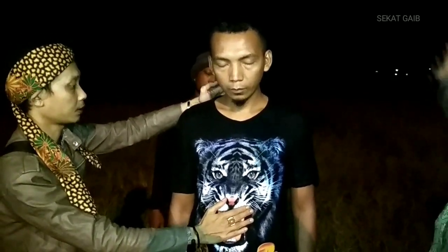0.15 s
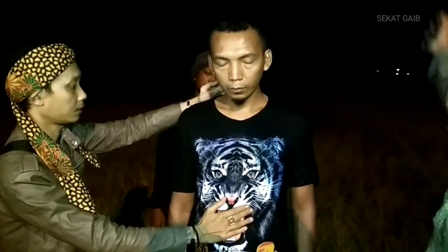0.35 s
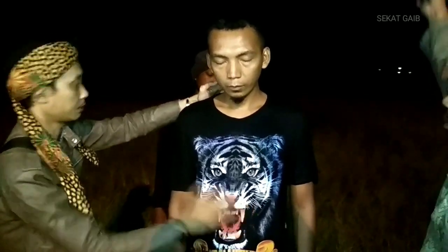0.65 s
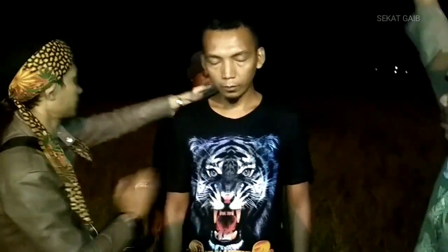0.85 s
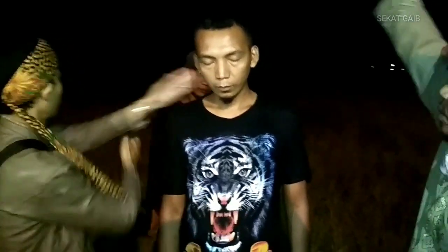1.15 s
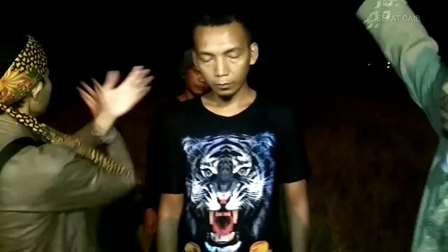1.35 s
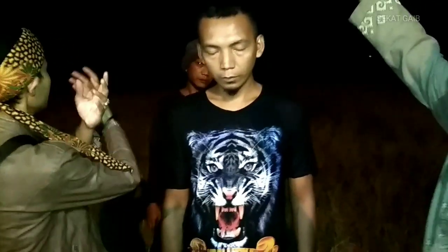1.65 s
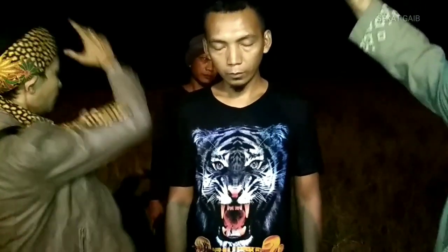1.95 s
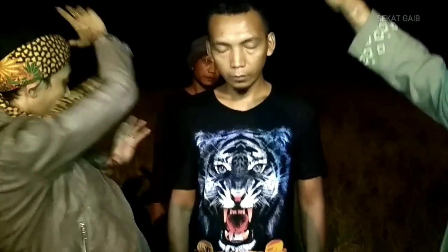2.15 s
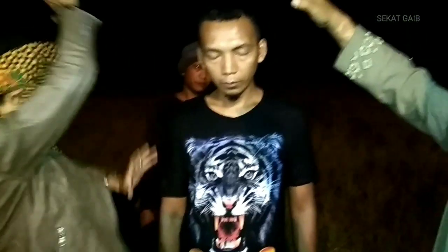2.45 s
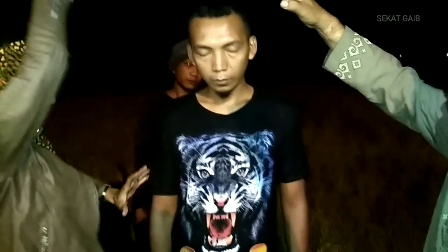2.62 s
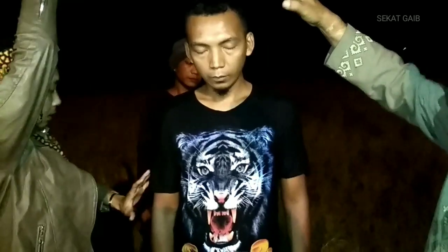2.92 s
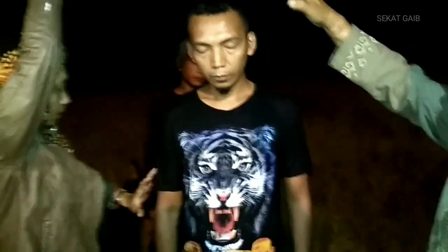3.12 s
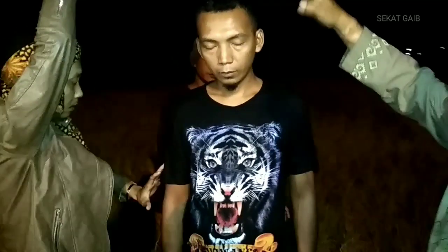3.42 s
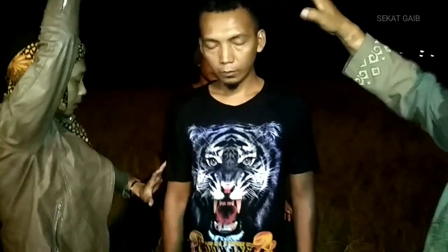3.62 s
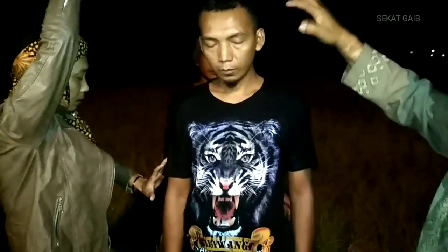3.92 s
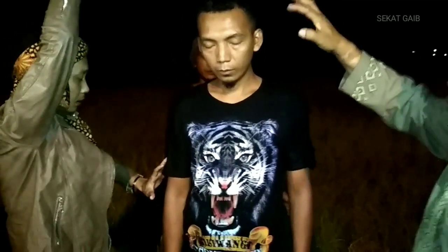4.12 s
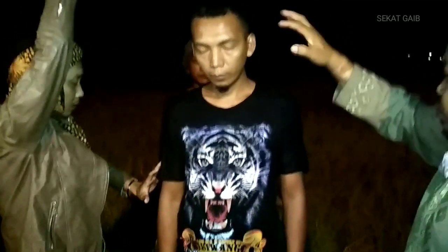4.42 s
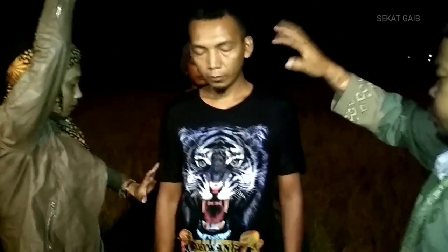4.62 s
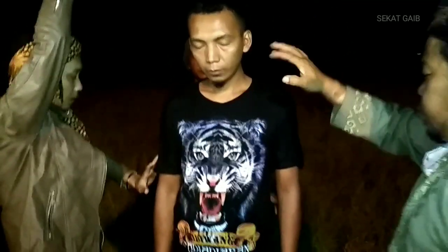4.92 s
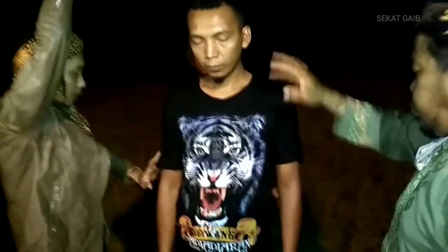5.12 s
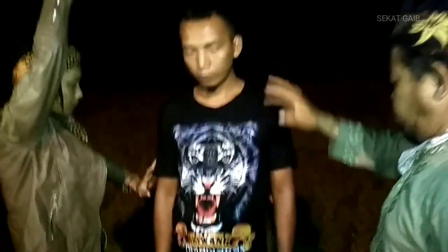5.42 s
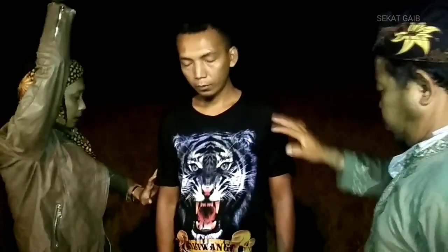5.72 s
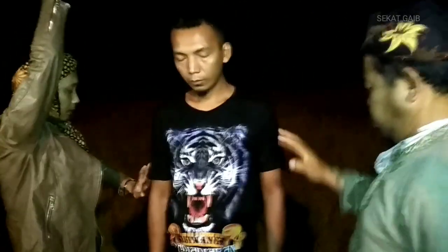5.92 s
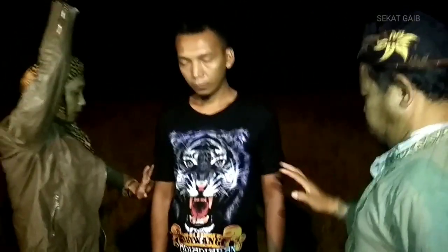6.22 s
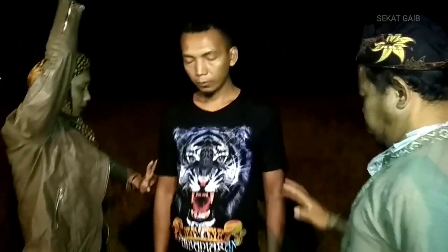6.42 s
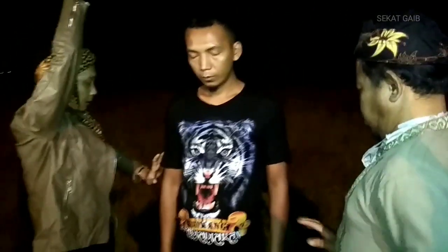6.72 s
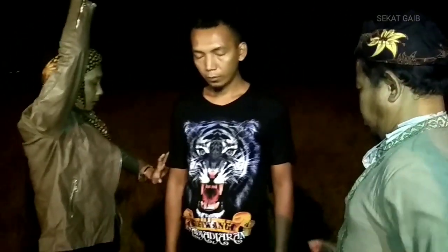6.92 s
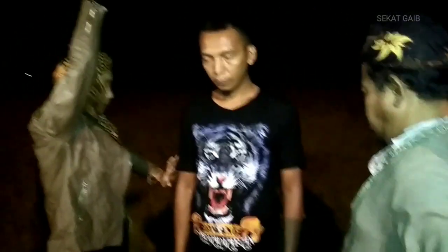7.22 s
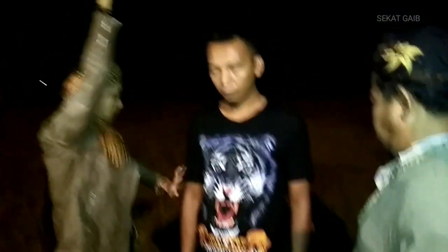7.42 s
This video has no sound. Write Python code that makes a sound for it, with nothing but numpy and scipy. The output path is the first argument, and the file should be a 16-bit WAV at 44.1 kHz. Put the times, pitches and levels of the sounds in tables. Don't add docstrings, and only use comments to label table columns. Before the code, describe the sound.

A near katydid on the left scrapes about four bright chirps a second above shrill insect buzzing, joined by a far cricket, over faint low haze.

```python
import sys
import numpy as np
from scipy import signal
from scipy.fft import rfft, irfft
from scipy.io import wavfile
from scipy.ndimage import uniform_filter1d

SR = 44100
rng = np.random.default_rng(int(sys.argv[2]) if len(sys.argv) > 2 else 0)


def unload_audio(sound):
    columns = np.transpose(np.atleast_2d(sound))
    steps = np.round(np.clip(columns, -1, 1) * 32767)
    wavfile.write(sys.argv[1], SR, steps.astype(np.int16))


def gain_from_decibels(decibels):
    exponent = np.asarray(decibels, float) / 20
    return 10 ** exponent


N = 332955

# pitch_hz, level_db (per Hz)
HAZE_SPECTRUM = [(13, -58), (22, -49), (48, -8), (171, -1), (235, -10), (278, -12), (311, -15), (348, -18),
                 (524, -26), (884, -29.5), (971, -38.5), (1520, -55.5), (1900, -66), (2470, -80),
                 (4180, -120)]
# low_hz, high_hz, level_db, throb_hz
CHORUS_BANDS = [
    (2162, 2642, -53.5, 30),
    (4307, 5170, -47.5, 56),
    (2780, 3850, -60.5, 9),
]
# time_s, rest_db (between pulses), pulse_db (rise on a pulse)
FROG_PULSING = [
    (0, -60.5, 7),
    (1, -56.5, -1.5),
    (2, -57, 5.5),
    (3.1, -58, 6),
    (3.8, -58.5, 5),
    (5.4, -59, 3),
    (6.2, -59.5, 6),
    (6.8, -63.5, 14.5),
    (7.55, -54.5, 3.5),
]
# peak_s, level_db, rise_s, fall_s, treble_db
BRUSHES = [(.8, -58, 0.2, 0.31, -19), (1.19, -56.5, 0.055, 0.83, -20), (1.6, -47.5, 0.084, 0.096, 6.5),
           (1.91, -50, 0.21, 0.45, 0.5), (2.5, -54.5, 0.22, 0.22, -24), (2.9, -55, 0.22, 0.59, -24),
           (3.45, -55.5, 0.6, 0.32, -22), (3.8, -58, 0.16, 0.56, -13), (4.25, -62, 0.36, 0.3, -20),
           (4.68, -64.5, 0.042, 0.29, -21), (5.22, -54.5, 0.11, 0.082, -11), (5.76, -54, 0.19, 0.23, -20),
           (5.96, -53.5, 0.085, 0.22, -26), (6.6, -61.5, .3, 0.29, -19), (7.46, -65, 0.29, 0.28, -21)]
# pitch_hz, level_db (per Hz)
RUSTLE_SPECTRUM = [(240, -37), (400, -6.5), (681, -3), (874, -8), (973, -0.5), (1210, -8), (1440, -5.5),
                   (2000, -13.5), (2600, -73), (4400, -120)]
# start_s, level_db, pitch_hz, t60_s, pan_db (left minus right)
FOOTFALLS = [(.648, -42, 300, 0.076, 8), (.976, -38, 358, 0.038, .5), (1.505, -34.5, 650, 0.12, 0),
             (1.62, -44, 820, .09, 0), (1.886, -30.5, 320, 0.32, 2), (1.915, -31, 317, .16, -3),
             (1.94, -39, 334, 0.09, 0), (2.488, -28, 510, 0.04, 1), (5.035, -43, 330, .06, .5),
             (5.759, -40, 600, 0.089, -3), (7.461, -44, 684, 0.091, 0)]
# pitch_hz, width_hz, left_db, right_db
BUZZER_BODY = [(10830, 2700, -29, -8), (12530, 2800, 0, 1.5), (14400, 1500, -14.5, -6)]
# time_s, level_db
BUZZER_LEVEL = [
    (0.0, -41),
    (1.53, -36),
    (1.58, -32),
    (1.91, -42.5),
    (2.96, -36),
    (3.89, -42),
    (5.72, -37),
    (6.27, -41),
    (7.06, -36.5),
    (7.55, -36.5),
]
# pitch_hz, width_hz, left_db, right_db
FAR_WINGS = [(6100, 700, 0, 0), (7100, 900, 1, 1), (8100, 900, 1, 4), (9000, 900, -.5, 1.5),
             (9900, 1100, .5, 2.5), (11100, 1300, -1, 4), (12300, 1100, -3, 2), (13300, 1000, 0, 2.5),
             (14700, 1400, -6, -6)]
# last_stroke_s, peak_db
CRICKET_CHIRPS = [(3.4087, -34.5), (3.639, -34.5), (3.8755, -33.5), (4.1094, -34), (4.3588, -32),
                  (4.58, -31), (4.7976, -31), (5.0306, -31.5), (5.2584, -30.5), (5.483, -29.5),
                  (5.7109, -30.5), (5.9415, -29), (6.1874, -29), (6.4128, -29.5), (6.633, -30.5),
                  (6.856, -30), (7.0835, -29.5), (7.3194, -32.5)]
# multiple (of the pitch), left_db, right_db
CRICKET_OVERTONES = [(1, -24, -19.5), (2, -31, -28), (3, -3, -5), (4, -6.5, -17), (5, -9, -26),
                     (6, -5.5, -27)]
# click_s, click_db
FULL_CHIRPS = [(0.0285, -14), (0.272, -17.5), (0.4993, -15), (0.7356, -17), (0.9665, -13.5), (1.201, -16),
               (1.4298, -15.5), (1.6573, -14), (1.888, -14.5), (2.125, -13), (2.3585, -18), (2.591, -14),
               (2.821, -14.5), (3.055, -12.5), (3.286, -14.5), (3.506, -16), (3.7375, -15), (3.9672, -12.5),
               (4.1918, -17), (4.4197, -12.5), (4.6486, -15), (5.283, -13.5), (5.516, -13), (5.7526, -13.5),
               (5.9785, -13), (6.2063, -14), (6.438, -12), (6.8798, -12.5), (7.1114, -16), (7.341, -12.5)]
# click_s, click_db
CUT_CHIRPS = [
    (4.8848, -16.5),
    (5.0835, -14),
    (6.673, -13),
]
# start_s, length_s, level_db
CHIRP_STROKES = [
    (-.021, .014, -16),
    (.0075, .003, -12),
    (.0155, .021, 0),
    (.0395, .021, 0),
    (.0635, .021, -1),
]
# time_s, level_db, upper_db (extra upper wing ring as it turns)
KATYDID_EFFORT = [
    (0, -26, -3),
    (1.5, -26, -0.5),
    (3, -25, -1.5),
    (4, -25, -2.5),
    (4.7, -26.5, 6),
    (5.2, -26.5, 4),
    (6, -24.5, 2.5),
    (7, -25, 5),
    (7.55, -25.5, 4.5),
]
# pitch_hz, width_hz, left_db, right_db
KATYDID_WING = [(6200, 1250, -18.5, -22), (7290, 1300, -11, -13), (7900, 950, -4, -9),
                (8500, 940, -11.5, -11.5), (9660, 640, -10.5, -12), (10560, 380, -14.5, -13),
                (11500, 1000, -16, -16.5), (12850, 830, -17.5, -31), (13870, 1200, -12, -22),
                (15300, 830, -16.5, -24), (3270, 1220, -30, -34.5), (2522, 220, -32, -37.5)]
# pitch_hz, level_db (per bin)
SILENCE_LIMIT = [(800, -39), (1300, -29.5), (1900, -33), (2400, -23), (3000, -19.5), (4000, -19.5),
                 (4700, -14.5), (5350, -10), (6500, -88), (10000, -37), (13500, -9), (14500, -11),
                 (16000, -6)]


def curve(table):
    time_s, *columns = np.transpose(table)
    return [np.interp(np.arange(N) / SR, time_s, column) for column in columns]


def level(x, db):
    return x * gain_from_decibels(db) / np.sqrt(np.mean(x ** 2))


def band(x, low_hz, high_hz, order=2):
    sos = signal.butter(order, [low_hz, min(high_hz, .45 * SR)], "band", fs=SR, output="sos")
    return signal.sosfilt(sos, x)


def stereo_gain(left_db, right_db):
    return gain_from_decibels(np.array([[left_db], [right_db]]))


def walk(rate_hz):
    hold = int(SR / rate_hz)
    held = np.repeat(rng.standard_normal(N // hold + 1), hold)
    return 1.3 * uniform_filter1d(uniform_filter1d(held, hold), hold)[:N]


def swell(peak_s, rise_s, fall_s):
    late = np.arange(N) / SR - peak_s
    return np.exp(np.where(late < 0, late / rise_s, -late / fall_s))


def coloured(spectrum, alike_hz):
    hz = np.maximum(np.fft.rfftfreq(N, 1 / SR), 1)
    pitch_hz, level_db = np.transpose(spectrum)
    colour = gain_from_decibels(np.interp(np.log(hz), np.log(pitch_hz), level_db))
    mid, side = rfft(rng.standard_normal((2, N)))
    alike = 1 / (1 + (hz / alike_hz) ** 2)
    pair = [np.sqrt(1 + alike) * mid + sign * np.sqrt(1 - alike) * side for sign in (1, -1)]
    return level(irfft(colour * np.array(pair), N), 0)


def body(drive, modes):
    out = 0
    for pitch_hz, width_hz, left_db, right_db in modes:
        ring = band(drive(), pitch_hz - width_hz / 2, pitch_hz + width_hz / 2)
        out = out + stereo_gain(left_db, right_db) * ring / np.sqrt(width_hz / 1000)
    return out


def grass(x, lag_s, wet_db, t60_s):
    t = np.arange(int(.15 * SR)) / SR
    tails = rng.standard_normal((2, len(t))) * np.exp(-np.log(1000) * t / t60_s) * (t > .0004)
    tails = tails / np.sqrt(np.sum(tails ** 2, axis=1, keepdims=True))
    delay = np.exp(-2j * np.pi * np.fft.rfftfreq(N, 1 / SR) * lag_s)
    late = irfft(rfft(x[1]) * delay, N)
    return np.array([x[0], late]) + gain_from_decibels(wet_db) * signal.fftconvolve(x, tails, axes=1)[:, :N]


def teeth(rate_hz, jitter):
    gaps = SR / rate_hz * np.exp(jitter * rng.standard_normal(int(2 * rate_hz * N / SR)))
    at = np.cumsum(gaps).astype(int)
    return at[at < N]


def rasp(force, modes, rate_hz, scatter_db, hiss_db):
    at = teeth(rate_hz, jitter=.25)
    size = gain_from_decibels(scatter_db * rng.standard_normal(len(at)))

    def drive():
        x = gain_from_decibels(hiss_db) * rng.standard_normal(N)
        x[at] += size * rng.uniform(-1.0, 1, len(at))
        return x * force
    return body(drive, modes)


def add_stroke(force, start_s, length_s, level_db):
    u = np.arange(int(length_s * SR)) / (length_s * SR)
    stroke = gain_from_decibels(level_db) * np.minimum(u / 0.037, 1) * np.minimum((1 - u) / 0.2, 1)
    i = int(start_s * SR)
    force[i:i + len(u)] += stroke[:N - i]


def haze():
    return coloured(HAZE_SPECTRUM, alike_hz=483) * gain_from_decibels(-36.5 + 0.63 * walk(4.83))


def chorus():
    layers = []
    for low_hz, high_hz, level_db, throb_hz in CHORUS_BANDS:
        throb = gain_from_decibels([2.54 * walk(throb_hz) + 1.57 * walk(3.16) for _ in range(2)])
        noise = band(rng.standard_normal((2, N)), low_hz, high_hz, order=4)
        layers.append(level(throb * noise, level_db))
    frogs, crickets, filler = layers
    rest_db, pulse_db = curve(FROG_PULSING)
    t = np.arange(N) / SR
    lag_s, half_length_s = 0.066, 0.055
    pulse = sum(np.exp(-((t - click_s - lag_s) / half_length_s) ** 2 / 2)
                for click_s, _ in FULL_CHIRPS + CUT_CHIRPS)
    return frogs * gain_from_decibels(rest_db + pulse_db * pulse + 56.0) + crickets + filler


def rustle():
    brush_power, edge_power = 0, 0
    for peak_s, level_db, rise_s, fall_s, treble_db in BRUSHES:
        shape = swell(peak_s, rise_s, fall_s) * gain_from_decibels(level_db)
        brush_power = brush_power + shape ** 2
        edge_power = edge_power + (shape * gain_from_decibels(treble_db)) ** 2
    brush = np.sqrt(brush_power) + gain_from_decibels(-75)
    grain = coloured(RUSTLE_SPECTRUM, alike_hz=300) * gain_from_decibels(1.8 * walk(40))
    hiss = level(band(rng.standard_normal((2, N)), 3700, 11000), 0)
    return (grain * brush + hiss * np.sqrt(edge_power)) * gain_from_decibels(5.0)


def steps():
    out = np.zeros((2, N))
    t = np.arange(int(.2 * SR)) / SR
    for start_s, level_db, pitch_hz, t60_s, pan_db in FOOTFALLS:
        decay = np.exp(-np.log(1000) * t / t60_s)
        burst = rng.standard_normal(len(t)) * np.minimum(t / 0.0064, 1) * decay
        burst = band(burst, 0.76 * pitch_hz, 1.6 * pitch_hz)
        burst = burst / np.max(np.abs(burst)) * stereo_gain(level_db + pan_db / 2, level_db - pan_db / 2)
        i = int(start_s * SR)
        out[:, i:i + len(t)] += burst[:, :N - i]
    return out


def buzzer():
    pulse_hz = 440.4
    phase = np.cumsum(pulse_hz * (1 + .0025 * walk(12))) / SR
    at = np.flatnonzero(np.diff(np.floor(phase)))
    after = phase[at + 1] % 1 * SR / pulse_hz
    strong_weak = 1 - .45 * (np.arange(len(at)) % 2)
    size = strong_weak * gain_from_decibels(3.8 * rng.standard_normal(len(at)))
    pulses = np.zeros(N + 8)
    for tap in range(-7, 8):
        pulses[np.abs(at + tap)] += size * np.sinc(tap - 1 + after) * np.cos(np.pi * tap / 16) ** 2
    near = level(body(lambda: pulses[:N], BUZZER_BODY), 0)
    near = near * gain_from_decibels(curve(BUZZER_LEVEL)[0] - 4.5 + 1.0 * walk(6.3))
    crowd = []
    for side in range(2):
        singers = rasp(gain_from_decibels(1.06 * walk(25)), FAR_WINGS, rate_hz=1100, scatter_db=5.0, hiss_db=-7.0)
        crowd.append(singers[side])
    return level(np.array(crowd), -38.5) + grass(near, -.0002, wet_db=-3.0, t60_s=.06)


def far_cricket():
    force = np.zeros(N)
    for last_stroke_s, peak_db in CRICKET_CHIRPS:
        for back in range(3):
            weaker_db = 7 * (back == 2)
            add_stroke(force, last_stroke_s - .003 - .0248 * back, .017, peak_db - weaker_db)
    force = uniform_filter1d(force, size=130)
    slide = 0.073 * np.gradient(np.log(uniform_filter1d(force, size=400) + 1e-3)) + 0.0068 * walk(500)
    pitch_hz = 2402
    phase = 2 * np.pi * np.cumsum(pitch_hz * (1 + slide)) / SR
    song = 0
    for multiple, left_db, right_db in CRICKET_OVERTONES:
        flutter = gain_from_decibels(4 * walk(300))
        song = song + stereo_gain(left_db, right_db) * flutter * np.sin(multiple * phase)
    scrape = rasp(force, FAR_WINGS, rate_hz=210, scatter_db=2.5, hiss_db=-14.5) * gain_from_decibels(10.5)
    return grass(song * force * gain_from_decibels(-2.5) + scrape, .0001, wet_db=-3.0, t60_s=.05)


def near_katydid():
    force, click = np.zeros(N), np.zeros(N)
    for chirps, strokes in ((FULL_CHIRPS, CHIRP_STROKES), (CUT_CHIRPS, CHIRP_STROKES[:-1])):
        for click_s, click_db in chirps:
            click[int(click_s * SR) + np.array([0, 30])] = gain_from_decibels(click_db) * np.array([1, .6])
            for start_s, length_s, stroke_db in strokes:
                add_stroke(force, click_s + start_s, length_s, stroke_db + 1.04 * rng.standard_normal())
    level_db, upper_db = curve(KATYDID_EFFORT)
    song = rasp(force, KATYDID_WING, rate_hz=330, scatter_db=0.2, hiss_db=-22.0) * gain_from_decibels(level_db + 34.5)
    song = song + (gain_from_decibels(upper_db) - 1) * band(song, 7650, 8400)
    song = song + body(lambda: click, KATYDID_WING) * gain_from_decibels(23.5)
    return grass(song, lag_s=.00041, wet_db=-2.0, t60_s=.055)


def scene():
    return haze() + chorus() + rustle() + steps() + buzzer() + far_cricket() + near_katydid()


def empty_bands(x, masking_db, load_db, luck_db):
    shape = dict(window="cosine", nperseg=2048, noverlap=1024)
    shift = 88
    hz, _, z = signal.stft(np.roll(x, -shift, axis=1), SR, **shape)
    bins = len(hz)
    power = np.mean(np.abs(z) ** 2, axis=0, keepdims=True)
    narrow = np.repeat(uniform_filter1d(power, size=9, axis=1)[:, 4::9], 9, axis=1)[:, :bins]
    pitch_hz, limit_db = np.transpose(SILENCE_LIMIT)
    limit = gain_from_decibels(np.interp(hz, pitch_hz, limit_db - 56.5))[:, None] ** 2
    shadow = uniform_filter1d(power, size=120, axis=1) * (hz[:, None] > 4500)
    limit = limit + gain_from_decibels(masking_db) ** 2 * shadow
    load = np.mean(power[:, hz > 6000], axis=1, keepdims=True) * (hz[:, None] > 1700)
    limit = limit + gain_from_decibels(load_db) ** 2 * load
    luck = 2 * uniform_filter1d(rng.standard_normal((bins // 9 + 1, z.shape[2])), size=4, axis=1)
    limit = limit * gain_from_decibels(luck_db * np.repeat(luck, 9, axis=0)[:bins]) ** 2
    keep = 1 / (1 + (limit / (narrow + 1e-18)) ** 40)
    return np.roll(signal.istft(z * keep, SR, **shape)[1][:, :N], shift, axis=1)


def roll_off(x):
    return signal.sosfilt(signal.butter(12, 16670, fs=SR, output="sos"), x)


def record(dry):
    top_cut = signal.ellip(8, .2, 60, 15500, fs=SR, output="sos")
    mix = signal.sosfilt(top_cut, dry)
    mix = empty_bands(mix, masking_db=-12.5, load_db=-20.0, luck_db=5.5)
    return roll_off(mix)


dry = scene()
out = record(dry)
unload_audio(out)
```